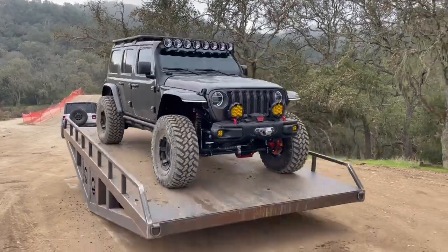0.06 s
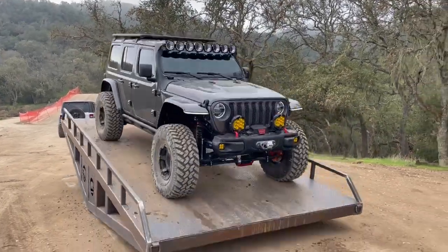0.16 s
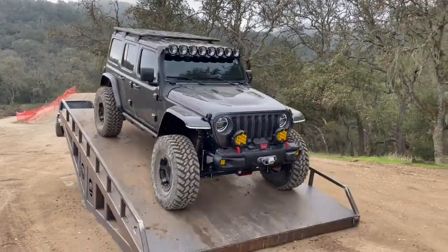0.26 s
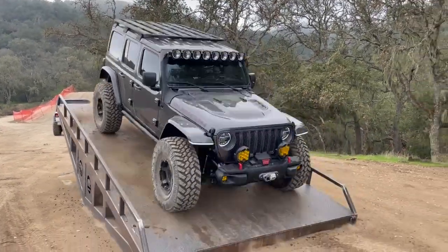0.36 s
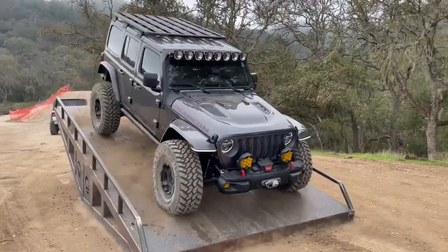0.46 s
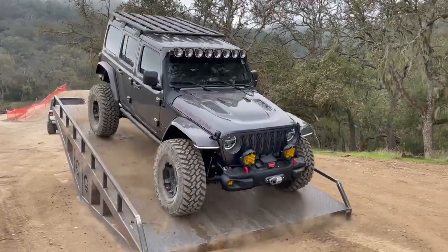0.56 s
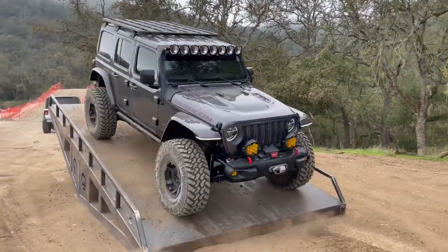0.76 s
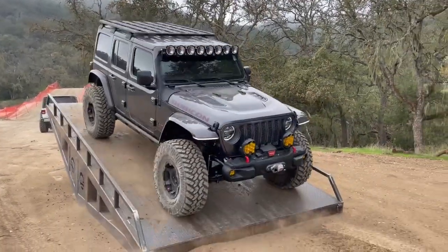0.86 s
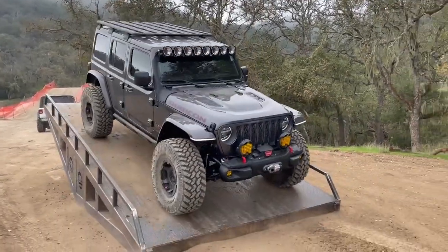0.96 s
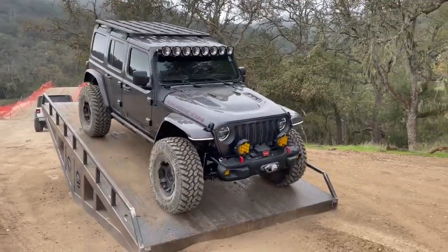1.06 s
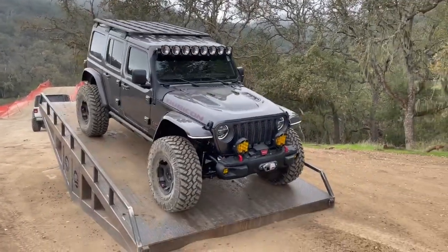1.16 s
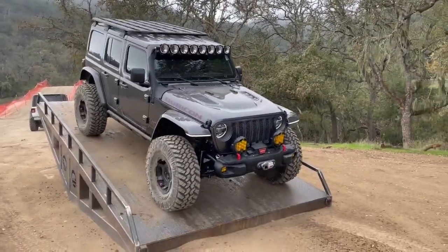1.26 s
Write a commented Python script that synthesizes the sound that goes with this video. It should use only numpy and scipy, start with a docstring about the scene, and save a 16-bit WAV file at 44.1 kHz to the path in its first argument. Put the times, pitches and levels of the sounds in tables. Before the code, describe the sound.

Big metal platform crashes down on dirt, booming and rattling out over a faint engine idle

```python
"""On dirt ground, a few metres from a phone, a heavy steel seesaw deck with a car on it tips and slams down.
Repeated blows swell decaying sines for the deck's boom; noise roughened by dense knocks drives the
clattering plates, low noise makes the frame shudder, and bright bursts mark the plate crashes.
Under it the engine idles: shaped noise plus narrow resonances that waver because noise drives them."""
import sys
import numpy as np
from scipy import signal
from scipy.fft import rfft, irfft, next_fast_len
from scipy.io import wavfile
from scipy.ndimage import uniform_filter1d, minimum_filter1d

SR = 44100
rng = np.random.default_rng(int(sys.argv[2]) if len(sys.argv) > 2 else 0)


def transcribe(u):
    """Save the signal u as a 16-bit wav file named by the first command-line argument.

    u: samples, shape (n,) or (channels, n), limited to [-1, 1]; the rate is SR.
    q: integer samples, one column per channel.
    """
    v = np.clip(np.atleast_2d(u).T, -1, 1)
    q = np.round(v * 32767).astype(np.int16)
    wavfile.write(sys.argv[1], SR, q)


N = 57330  # samples, 1.3 s

# Engine idle spectrum, relative: f/Hz, level/dB per Hz
ENGINE_SPECTRUM = [(30, -28.5), (57, -10), (110, -2.5), (175, -16.5), (225, -33.5), (340, -17.5),
                   (430, -33), (1200, -26), (1800, -23.5), (2300, -34.5), (5200, -46), (11000, -60.5),
                   (15000, -66)]
# Wavering engine tones, relative to each other: f/Hz, level/dB, t60/s
ENGINE_TONES = [(57, 0, .3), (130, -8, .25), (175, -5, .4), (345, -15, .15)]
ENGINE_TONES_DB = 3  # all tones together, against the rumble
# Engine fader: t/s, level/dB, extra level above the split/dB
ENGINE_LEVEL = [(0, -33, 0.5), (.1, -33.5, 0), (.2, -31.5, -1.5), (.28, -31.5, -1.5), (.4, -24.5, -9),
                (1.1, -32.5, -10), (1.3, -34.5, -10.5)]
ENGINE_SPLIT_HZ = 500

# Shaking of the frame, before the trims: t/s, clatter level/dB, clatter treble level/dB, shudder level/dB
FRAME_SHAKE = [(0.27, -42, -56, -49), (0.308, -31.5, -46.5, -27.5), (0.334, -12.5, -22, -11),
               (0.386, -15, -25.5, -14), (0.396, -16, -28.5, -22.5), (0.516, -22, -32.5, -25.5),
               (0.546, -16.5, -28.5, -20.5), (0.614, -20.5, -32, -29.5), (0.644, -24.5, -33, -22),
               (0.67, -22.5, -32, -28), (0.696, -24.5, -36.5, -20.5), (0.724, -25, -39, -26.5),
               (0.784, -31.5, -45.5, -27.5), (0.798, -27, -40.5, -24), (0.836, -30, -45.5, -34),
               (0.92, -31, -49.5, -24), (0.972, -33, -50.5, -27.5), (0.99, -30.5, -50, -63),
               (1.01, -37.5, -53.5, -26), (1.104, -42, -63, -35.5), (1.116, -43.5, -56, -60.5),
               (1.132, -44, -68, -45.5), (1.166, -48.5, -61, -43.5), (1.2, -48.5, -62, -35)]
# Clatter spectrum, relative: f/Hz, level/dB per Hz
CLATTER_SPECTRUM = [(350, -11.5), (480, -0.5), (650, 3), (1300, -1), (2300, -4.5), (2700, -8),
                    (4500, -19.5), (7000, -25.5), (11000, -29), (14000, -40), (15000, -61.5)]
# Ringing modes of the plates, relative to each other: f/Hz, level/dB, t60/s
PLATE_MODES = [(365, -2, .25), (472, -6, .3), (630, 0, .35), (700, -3, .4), (942, -1, .45), (1026, 1, .45),
               (1157, -1, .4), (1427, -2, .4), (1587, 1, .35), (1819, -2, .35), (1966, 1, .25),
               (2120, -2, .35)]
PLATES_DB = -10  # all plate modes together, against the clatter noise
KNOCKS_PER_S, KNOCK_TAIL_S = 1500, .0017  # mean density; time to fall to 1/e
KNOCK_SPREAD_DB = 3.5  # mean of the exponential spread in knock size
HISS_SHARE = .79  # steady part of the noise drive; the knocks shape the rest
CLATTER_SPLIT_HZ, TREBLE_TRIM_DB = 2286, 3

# Shudder spectrum, relative: f/Hz, level/dB per Hz
SHUDDER_SPECTRUM = [(30, -16), (50, -1.5), (110, 1.5), (180, -4.5), (230, -3), (300, -5.5), (380, -13),
                    (480, -13)]
SHUDDER_TRIM_DB = 1.5

# Blows of the deck on the ground: t/s, push length/s, then level/dB for each of the four low modes
DECK_BLOWS = [(.293, .038, -45, -26, -10, -26), (.330, .028, -10.5, -34, -34, -30),
              (.405, .02, -30, -20, -17, -26), (.45, .02, -24, -24, -18, -24),
              (.50, .03, -21, -22, -22, -30), (.555, .03, -15, -22, -22, -30),
              (.59, .02, -22, -19, -20, -26), (.685, .02, -22, -30, -26, -20),
              (.755, .02, -24, -32, -24, -22), (.825, .015, -30, -24, -25, -30),
              (.89, .02, -28, -30, -21, -28), (.935, .02, -25, -24, -32, -26),
              (.98, .02, -30, -24, -24, -32), (1.02, .02, -26, -32, -27, -34),
              (1.10, .02, -40, -29, -30, -34)]
# Low modes of the deck and its beams: f/Hz, t60/s
DECK_MODES = [(49, .22), (88, .15), (112, .11), (142, .12)]

# Bright plate crashes: t/s, level/dB
CRASH_HITS = [(0.327, -9.5), (0.533, -27), (0.666, -34)]
# Crash spectrum, relative: f/Hz, level/dB per Hz
CRASH_SPECTRUM = [(1200, -8), (1600, 0.5), (2000, 2), (2200, -0.5), (2430, 8.5), (2600, -28)]
CRASH_RISE_S, CRASH_T60_S = .012, .25

# Tone of the sum of the two microphone ports: f/Hz, level/dB
MID_TONE = [(20, -14), (42, 0.5), (6500, -2), (7400, -6.5), (8100, -58), (9100, -27), (10000, -5),
            (15000, 6.5)]
# Tone of the scattered sound in their difference: f/Hz, level/dB
WIDE_TONE = [(30, -32), (300, -18), (700, -9.5), (2000, -6.5), (5000, -4.5), (7000, -3), (9000, 5.5),
             (11500, -3), (12600, -39.5)]
# Lean of the image, in phase: f/Hz, share of the sum added left and taken right
LEAN = [(60, -0.11), (200, -0.14), (500, -0.009), (1500, -0.0093), (2500, 0.34), (6000, .05), (9000, 0)]
# Phase offset between ports: f/Hz, share of the sum, shifted a quarter cycle, added left and taken right
PORT_PHASE = [(60, 0.21), (300, .02), (700, 0.29), (1500, 0.17), (2500, 0.22), (5000, 0.17), (8000, 0)]
CEILING, HOLD_S = .96, .002  # limiter peak in full scale, before the top cut; hold on each side of a peak
TOP_HZ = 15760


def undb(db):
    """Turn decibels into an amplitude factor."""
    return 10 ** (np.asarray(db) / 20)


def unit(x):
    """Scale to an RMS of 1."""
    return x / np.sqrt(np.mean(x ** 2))


def on_log(table, hz):
    """Table value at hz, straight lines on a log-frequency axis."""
    table = np.array(table, float)
    return np.interp(np.log(np.maximum(hz, 1)), np.log(table[:, 0]), table[:, 1])


def shape(x, gain):
    """Filter by a gain given as a function of Hz."""
    size = next_fast_len(N + 4096)
    hz = np.arange(size // 2 + 1) * SR / size
    return irfft(rfft(x, size) * gain(hz), size)[..., :N]


def colour(x, table):
    """Filter by a (Hz, dB) table, rolled off steeply below its first point and above its last."""
    def gain(hz):
        low_edge = np.clip(hz / table[0][0], 0, 1) ** 4
        high_edge = np.clip(table[-1][0] / (hz + 1), 0, 1) ** 4
        return undb(on_log(table, hz)) * low_edge * high_edge
    return shape(x, gain)


def ring(x, modes):
    """Sum decaying resonances, each with gain near 1 at its centre before its own level."""
    out = 0
    for hz, db, t60 in modes:
        r = np.exp(-np.log(1000) / (t60 * SR))  # pole radius for a 60 dB decay in t60
        b = [(1 - r * r) / 2, 0, -(1 - r * r) / 2]
        a = [1, -2 * r * np.cos(2 * np.pi * hz / SR), r * r]
        out = out + undb(db) * signal.lfilter(b, a, x)
    return out


def curve(rows, column, before_db=-80):
    """Column of a time table at every sample."""
    rows = np.array(rows, float)
    return np.interp(np.arange(N) / SR, rows[:, 0], rows[:, column], left=before_db)


def engine():
    """Idling rumble and noise-driven resonant tones, with fan and belt hiss above."""
    rumble = unit(colour(rng.standard_normal(N), ENGINE_SPECTRUM))
    tones = unit(ring(rng.standard_normal(N), ENGINE_TONES))
    idle = rumble + undb(ENGINE_TONES_DB) * tones
    low = shape(idle, lambda f: 1 / (1 + (f / ENGINE_SPLIT_HZ) ** 4))
    high = (idle - low) * undb(curve(ENGINE_LEVEL, 2))
    return undb(curve(ENGINE_LEVEL, 1)) * (low + high)


def clatter():
    """Dense uneven knocks with short tails shake the plates' modes; the treble has its own level."""
    struck = rng.random(N) < KNOCKS_PER_S / SR
    knocks = struck * undb(KNOCK_SPREAD_DB * rng.exponential(size=N))
    tails = unit(signal.lfilter([1], [1, -np.exp(-1 / (KNOCK_TAIL_S * SR))], knocks))
    drive = rng.standard_normal(N) * (HISS_SHARE + (1 - HISS_SHARE) * tails)
    plates = unit(ring(drive, PLATE_MODES))
    body = unit(colour(drive, CLATTER_SPECTRUM)) + undb(PLATES_DB) * plates
    low = shape(body, lambda f: 1 / (1 + (f / CLATTER_SPLIT_HZ) ** 8))
    treble = unit(body - low) * undb(curve(FRAME_SHAKE, 2) + TREBLE_TRIM_DB)
    return unit(low) * undb(curve(FRAME_SHAKE, 1)) + treble


def shudder():
    """The frame trembles as low noise that swells and dips with the shaking."""
    fade = np.clip((1.3 - np.arange(N) / SR) / .04, 0, 1)  # out over the last 40 ms
    tremble = unit(colour(rng.standard_normal(N), SHUDDER_SPECTRUM))
    return tremble * undb(curve(FRAME_SHAKE, 3) + SHUDDER_TRIM_DB) * fade


def booms():
    """Each blow swells the deck's low modes over its push; then they ring out exponentially."""
    t, out = np.arange(N) / SR, 0
    for start, push, *levels in DECK_BLOWS:
        age = np.maximum(t - start, 0)
        swell = np.sin(np.pi / 2 * np.minimum(age / push, 1))
        for (hz, t60), db in zip(DECK_MODES, levels):
            decay = undb(db - 60 * np.maximum(age - push, 0) / t60)
            # root two makes the level an RMS one
            out = out + np.sqrt(2) * decay * swell * np.sin(2 * np.pi * hz * age)
    return out


def crash():
    """The hardest landings set the plates clashing: bright noise with a quick rise and a decay."""
    t, swell = np.arange(N) / SR, 0
    for start, db in CRASH_HITS:
        rise = np.clip((t - start) / CRASH_RISE_S, 0, 1)
        fall_db = 60 * np.maximum(t - start - CRASH_RISE_S, 0) / CRASH_T60_S
        swell = swell + rise * undb(db - fall_db)
    return swell * unit(colour(rng.standard_normal(N), CRASH_SPECTRUM))


def scene():
    """Mix the sum and difference of two ports; the difference hears scattered sound of its own."""
    centre = booms() + shudder() + clatter() + crash() + engine()
    scattered = shudder() + clatter() + crash() + engine()  # fresh noise
    mid = shape(centre, lambda f: undb(on_log(MID_TONE, f)))
    wide = shape(scattered, lambda f: undb(on_log(WIDE_TONE, f)))
    # the imaginary part shifts by a quarter cycle
    offset = shape(mid, lambda f: on_log(LEAN, f) + 1j * on_log(PORT_PHASE, f))
    side = wide + offset
    return np.array([mid + side, mid - side])


def record(dry):
    """A limiter ducks the loudest peaks smoothly, both channels alike; the phone cuts the top."""
    span = int(HOLD_S * SR)
    gain = np.minimum(1, CEILING / (np.abs(dry).max(axis=0) + 1e-9))
    held = minimum_filter1d(gain, 2 * span + 1)
    smooth = uniform_filter1d(held, span)
    top_cut = signal.ellip(10, .2, 90, TOP_HZ, fs=SR, output="sos")
    return signal.sosfilt(top_cut, dry * smooth)


dry = scene()
out = record(dry)
transcribe(out)
```